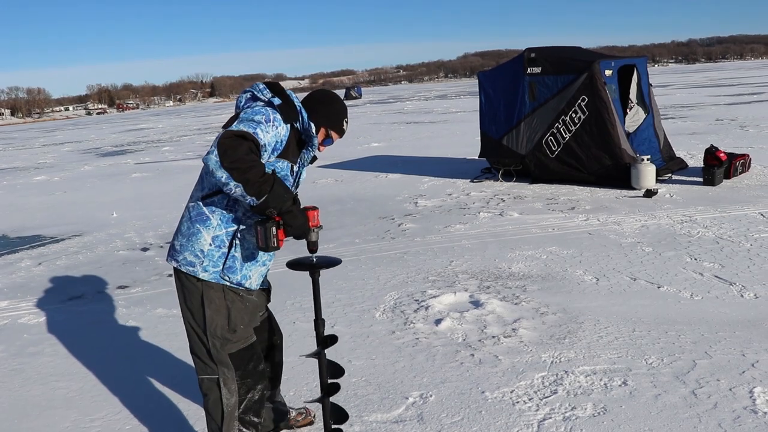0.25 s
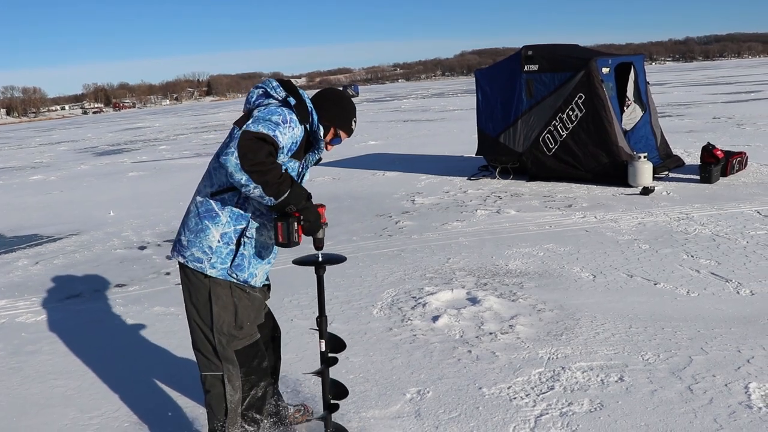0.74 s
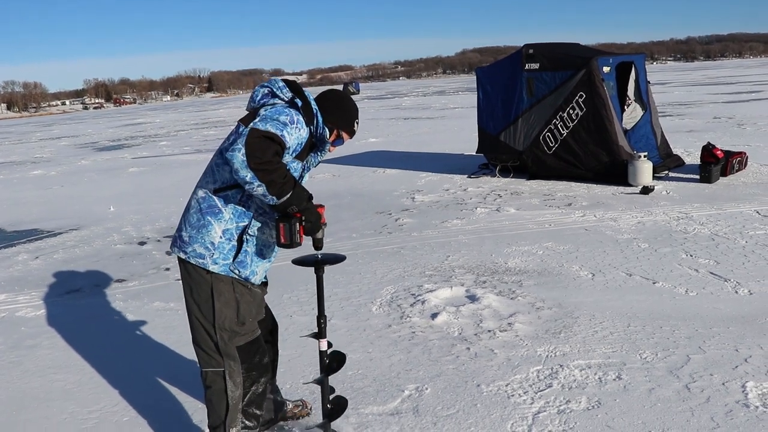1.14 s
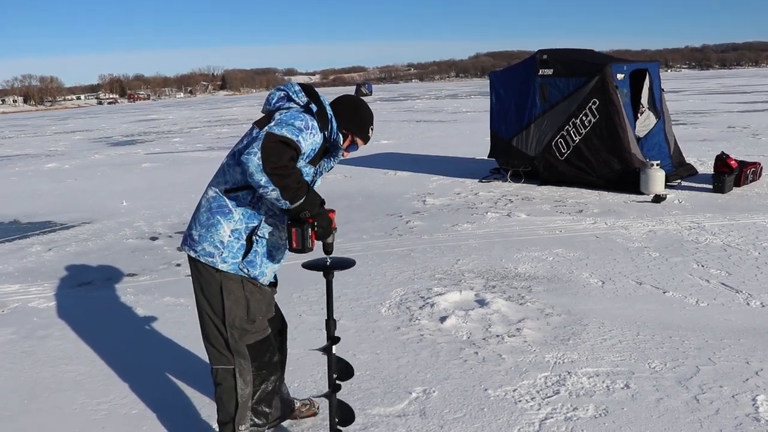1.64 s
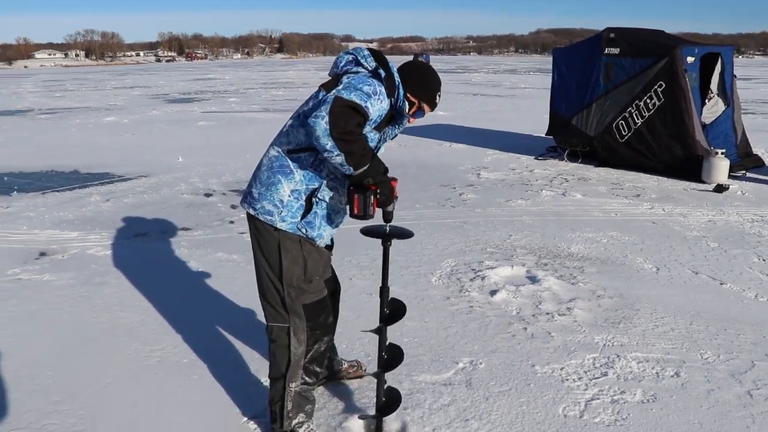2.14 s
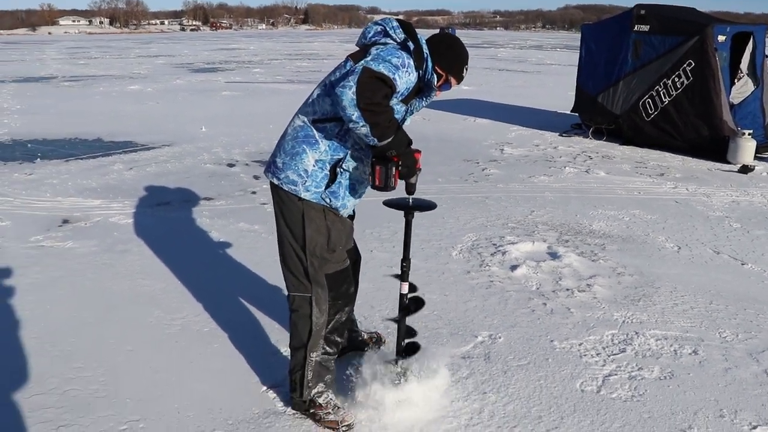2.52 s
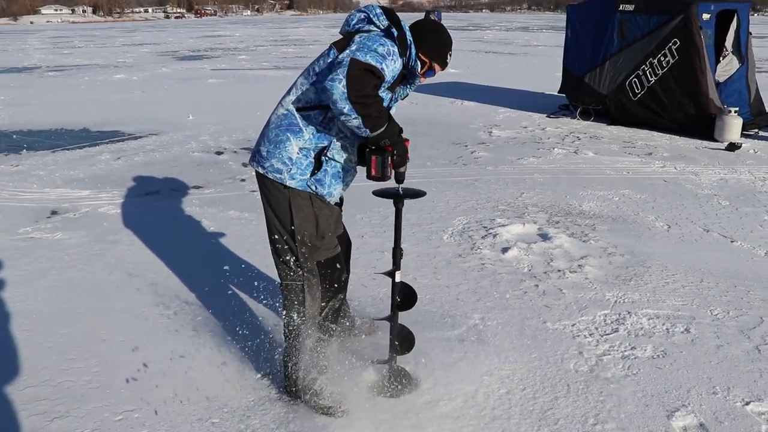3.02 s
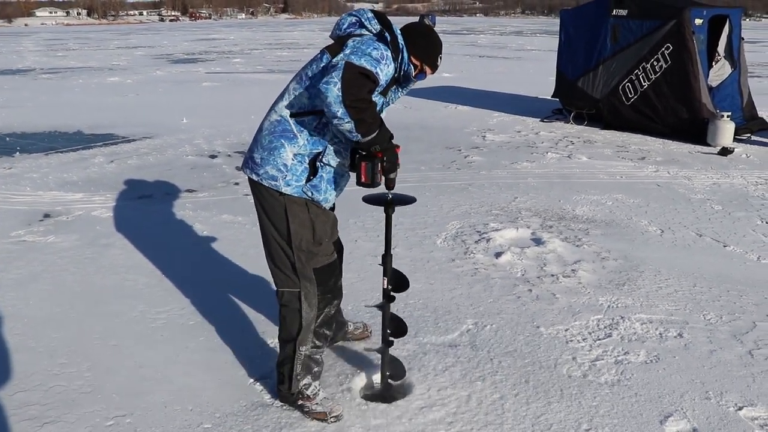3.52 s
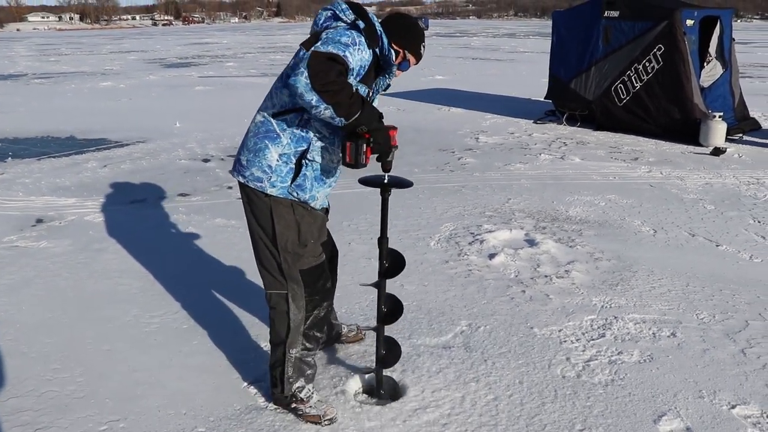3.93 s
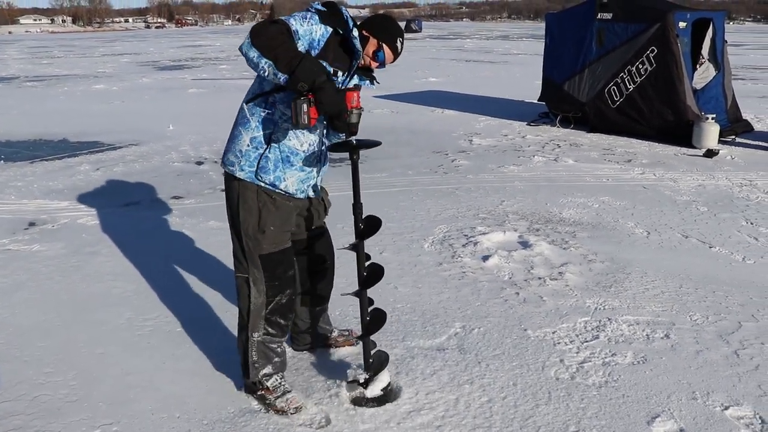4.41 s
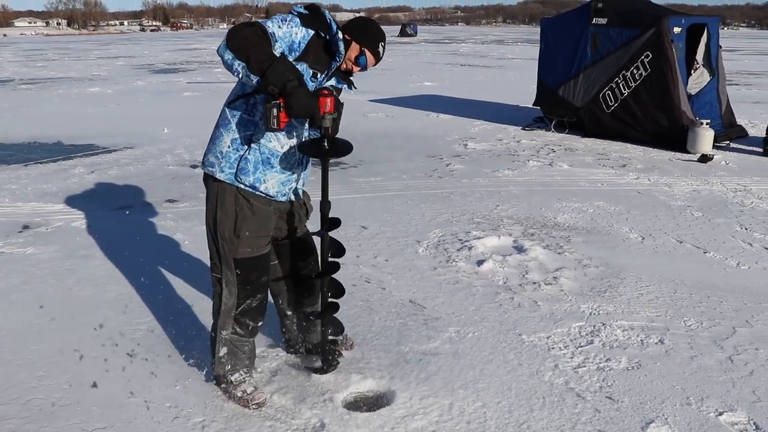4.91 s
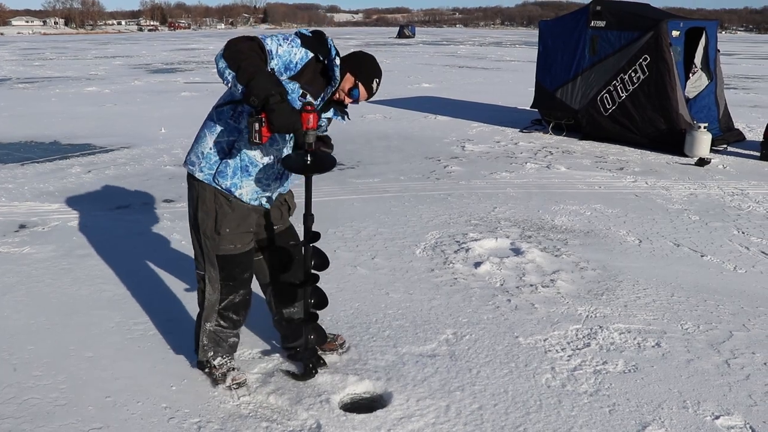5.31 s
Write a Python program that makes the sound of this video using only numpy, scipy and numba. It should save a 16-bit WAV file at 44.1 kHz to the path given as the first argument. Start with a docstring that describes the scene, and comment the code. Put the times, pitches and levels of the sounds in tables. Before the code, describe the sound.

On open lake ice, a few metres from the microphone, a drill-driven auger stutters and revs, then shaves steadily with a steely rasp, hollow crunch and fine hiss. After a quick rattle the cutting stops. The drill whines once more, very briefly, throwing off slush, followed by hollow knocks of ice lumps and sliding slush around the hole. The sound is dry, with a faint wind rumble underneath.

```python
"""On open lake ice, a few metres away, a cordless drill spins an auger while a light wind rumbles.
The gears whine up; the blades skip, bite, shave steadily, chatter at the bottom of the hole and stop.
A second short burst flings off the shavings; then lumps of ice knock and slush slides round the hole.
Cut and loose ice are showers of tiny fractures in three bands: a hollow crunch from the hole,
a steely rasp from the auger and a fine hiss."""
import sys
import numpy as np
from scipy import signal
from scipy.fft import rfft, irfft, next_fast_len
from scipy.io import wavfile
from scipy.ndimage import map_coordinates
from numba import njit

SR = 44100
rng = np.random.default_rng(int(sys.argv[2]) if len(sys.argv) > 2 else 0)


def generate_wav(sig):
    """Save sig (samples, or channels by samples) to the path in sys.argv[1] as 16-bit PCM at SR."""
    pcm = np.round(np.clip(np.atleast_2d(sig).T, -1, 1) * 32767).astype(np.int16)
    wavfile.write(sys.argv[1], SR, pcm)


N = 245028
TIME = np.arange(N) / SR


def undb(db):
    """Decibels to gain."""
    return 10 ** (np.asarray(db) / 20)


def unit(x):
    """Scale to rms 1."""
    return x / np.sqrt(np.mean(x ** 2))


def curves(table):
    """Each column after the time column as a value per sample."""
    times, *columns = np.transpose(table)
    return [np.interp(TIME, times, column) for column in columns]


def add(track, start_s, sound):
    """Mix a short sound into a track."""
    start = max(int(start_s * SR), 0)
    track[start:start + len(sound)] += sound[:N - start]


def envelope(start_s, length_s, attack_s, release_s):
    """Straight attack, with an exponential release from length_s after the start."""
    attack = np.clip((TIME - start_s) / attack_s, 0, 1)
    return attack * np.exp(-np.maximum(TIME - start_s - length_s, 0) / release_s)


def bump(centre_s, half_s):
    """A bell curve of height 1."""
    return np.exp(-((TIME - centre_s) / half_s) ** 2)


def wander(rate):
    """Smooth random drift through rate points a second; rms 1."""
    points = np.cumsum(np.full(N, rate / SR))
    return unit(map_coordinates(rng.standard_normal(4096), [points], order=3, mode="wrap"))


def colour(x, eq):
    """Minimum-phase EQ through (freq_hz, gain_db) points; rms 1."""
    hz, db = np.transpose(eq)
    size = next_fast_len(N + 8192) // 2 * 2
    freqs = np.maximum(np.arange(size // 2 + 1) * SR / size, 1)
    gain = undb(np.interp(np.log(freqs), np.log(hz), db))
    cepstrum = irfft(np.log(gain))
    cepstrum[1:size // 2] *= 2
    cepstrum[size // 2 + 1:] = 0
    return unit(irfft(np.exp(rfft(cepstrum)) * rfft(x, size))[:N])


@njit
def resonate(x, hz, width_hz):
    """State-variable band-pass whose centre can sweep."""
    out, band_state, low_state = np.empty(len(x)), 0., 0.
    for i in range(len(x)):
        tuning, damping = np.tan(np.pi * hz[i] / SR), width_hz / hz[i]
        band = (band_state + tuning * (x[i] - low_state)) / (1 + tuning * (tuning + damping))
        band_state = 2 * band - band_state
        low_state += 2 * tuning * band
        out[i] = damping * band
    return out


def fractures(rate, spread_db):
    """Tiny breaks in the ice, rate a second: many small, a few large; rms 1."""
    happens = rng.random(N) < rate / SR
    size = undb(spread_db * np.minimum(rng.exponential(size=N), 4))
    return unit(happens * size * rng.choice([-1, 1], N) / np.sqrt(rate))


# Low rumble of the wind: freq_hz, gain_db
WIND_EQ = [(15, -22), (30, -2.5), (50, -1.5), (72, 0), (100, -2.5), (150, -3.5), (260, -8), (600, -34.5)]
# Gusts over the steady bed: centre_s, half_length_s, level_db
GUSTS = [(.04, 0.12, -33.5), (.48, 0.21, -36.5), (1.7, 0.91, -52.5), (2.97, .05, -54), (3.33, 0.027, -37),
         (3.64, .03, -49), (4.69, 0.037, -45), (4.91, 0.035, -43), (5.33, 0.13, -41.5)]


def wind(bed_db=-55.5, flutter_db=2.0):
    """A light wind buffets the microphone, with a few gusts."""
    strength = undb(bed_db) + sum(undb(db) * bump(centre, half) for centre, half, db in GUSTS)
    rumble = colour(rng.standard_normal(N), WIND_EQ)
    return strength * unit(rumble * undb(flutter_db * wander(20)))


# Hollow body of the crunch: freq_hz, gain_db
CRUNCH_EQ = [(200, -53), (380, -13), (520, -6.5), (660, -2.5), (780, 3.5), (880, 4.5), (1000, -0.5),
             (1150, -6.5), (1400, -11), (2000, -18), (4000, -66)]


def crunch_tone(grains):
    """Breaking ice rings the hole."""
    return colour(grains, CRUNCH_EQ)


# Steely bite of the rasp: freq_hz, gain_db
RASP_EQ = [(700, -39), (1200, -7), (1600, -3), (1900, -0.5), (2250, 4), (2550, 2), (2850, 1.5), (3300, -4),
           (3900, -9.5), (4600, -10), (5600, -18.5), (7000, -20.5), (10000, -39)]


def rasp_tone(grains):
    """Breaking ice rings the auger's steel."""
    return colour(grains, RASP_EQ)


def shower(rise_s=0.13):
    """Envelope of flung shavings raining back on the ice: quick to start, slow to thin out."""
    return envelope(FLING_END_S, rise_s, rise_s, release_s=1.6)


def patter(crunch_db=-39, rasp_db=-46):
    """The larger crumbs of the shower land as separate ticks."""
    ticks = fractures(110, spread_db=3.0)
    return shower() * (undb(crunch_db) * crunch_tone(ticks) + undb(rasp_db) * rasp_tone(ticks))


# Heaps of slush giving way: start_s, length_s, attack_s, level_db
SLIDES = [(3.756, 0.03, .01, -30.5), (3.823, 0.063, .006, -30.5), (3.981, 0.018, 0.0037, -28.5),
          (4.04, 0.024, 0.0042, -30.5), (4.102, 0.14, 0.012, -30.5), (4.415, 0.064, 0.0091, -29.5),
          (5.039, 0.051, .01, -30), (5.276, 0.043, 0.0077, -23), (5.354, 0.13, 0.056, -19.5)]


def slides():
    """Envelope of the sliding heaps, each stopping short."""
    return sum(undb(db) * envelope(start, length, attack, release_s=0.011)
               for start, length, attack, db in SLIDES)


def slush_ring(pitch_hz=875.0, width_hz=210.0, gain_db=-5.5):
    """Sliding slush rings hollow in the hole, near 900 Hz."""
    hz = np.full(N, pitch_hz)
    grains = fractures(300, spread_db=3.0)
    ringing = resonate(resonate(grains, hz, width_hz), hz, width_hz)
    return undb(gain_db) * slides() * unit(ringing)


def slush(slide_db=(-1.5, -16, -44), shower_db=(-42, -41.5, -50), trickle_db=(-39.5, -49, -70)):
    """Power of crunch, rasp and hiss from sliding heaps, falling shavings and ever-trickling crumbs."""
    sliding = np.outer(undb(slide_db), slides())
    falling = np.outer(undb(shower_db), shower())
    return sliding ** 2 + falling ** 2 + undb(trickle_db)[:, None] ** 2


def ring(t, hz, rise_s):
    """A heavily damped resonance that swells for rise_s and dies in a few cycles."""
    return t / rise_s * np.exp(1 - t / rise_s) * np.sin(2 * np.pi * hz * t)


# Lump hits, with crack and thud sends relative to each: start_s, level_db, pitch_hz, crack_db, thud_db
KNOCKS = [(3.987, -21, 855, -19, -29), (4.107, -25, 850, -14, -28), (4.308, -20, 931, -18, -13),
          (4.37, -7.5, 944, -17, -12), (4.569, -8.5, 840, -6, -13), (4.881, -19, 840, -19, -24),
          (4.934, -19, 800, -2, -30), (4.961, -11.5, 890, -10, -40), (5.034, -13, 793, 0.5, -14),
          (5.049, -3.5, 825, -9, -40), (5.088, -14, 860, -24, -23), (5.121, -12.5, 760, -26, -20),
          (5.144, -9, 950, -30, -32), (5.159, -18, 805, -15, -27), (5.176, -11, 867, -20, -30),
          (5.215, -3, 856, -42, -19), (5.218, -1.5, 960, -40, -24), (5.229, -7, 920, -31, -36),
          (5.346, -6, 1080, -9, -16.5), (5.472, -4, 805, -23, -15), (5.491, -1.5, 770, -33, -49),
          (5.537, -9, 870, -9.5, -15)]


def lumps(crack_trim_db=-10, thud_hz=318):
    """Lumps of ice collide: a hollow knock, a bright crack and a low thud."""
    out, t = np.zeros(N), TIME[:2048]
    noise = rasp_tone(rng.standard_normal(N))
    for k, (start, db, hz, crack_db, thud_db) in enumerate(KNOCKS):
        knock = ring(t, hz, rise_s=0.00073)
        crack = undb(crack_db + crack_trim_db) * noise[k * len(t):(k + 1) * len(t)] * np.exp(-t / 0.005)
        thud = undb(thud_db) * ring(t, thud_hz, rise_s=0.0024)
        add(out, start + .0005, undb(db) * (knock + crack + thud))
    return out


# Bright accents of small chips: start_s, level_db, pitch_hz
CHIPS = [(0.4909, -3, 3100), (0.5687, -5, 2840), (4.3873, -22, 3140), (5.0274, -27, 2850),
         (5.1317, -28, 2725), (5.2645, -15, 3320), (5.3426, -20, 4600), (5.3521, -11.5, 3600),
         (5.415, -21, 3240)]


def chips(trim_db=-4):
    """Small chips snap and tinkle as they crack and land."""
    out, t = np.zeros(N), TIME[:2048]
    for start, db, hz in CHIPS:
        tinkle = ring(t, hz, rise_s=.0003) + .6 * ring(t, hz * rng.uniform(1.5, 2.2), rise_s=.0003)
        snap = np.diff(rng.standard_normal(len(t) + 1)) * np.exp(-t / 0.0022)
        add(out, start, undb(db + trim_db) * (tinkle + .18 * snap))
    return out


# Open depth of the hole, which slush fills as the auger lifts until it is flung off: time_s, depth_m
DEPTH = [(0, 0.012), (.62, 0.0047), (.95, .05), (1.15, 0.15), (2.1, 0.17), (3.1, 0.18), (4.25, 0.17),
         (4.42, 0.069), (4.53, 0.021), (4.6, 0.14), (5.5, 0.044)]
# Stretches where the hole's groan is quieter: start_s, length_s, loss_db
GROAN_DIPS = [(0.617, 0.32, 3), (2.12, 0.78, 6.5), (3.726, 0.32, 7), (4.578, 0.24, 5.5)]


def hole_groan(crunch_level, mouth_m=0.15, sound_m_s=343, gain_db=-14.5):
    """The crunch rings the hole's air column, a quarter wave whose pitch drops as it deepens."""
    hz = sound_m_s / (4 * (mouth_m + curves(DEPTH)[0]))
    dip_db = sum(db * envelope(start, length, 0.066, .04) for start, length, db in GROAN_DIPS)
    grains = fractures(1500, spread_db=3.0)
    column = resonate(resonate(grains, hz, 170.0), hz, 160.0)
    return unit(column) * crunch_level * undb(gain_db - dip_db)


# Low growl under the cut: time_s, pitch_hz, level_db
GROWL = [(.7, 87, -60), (1, 86, -56), (1.5, 84, -45), (2, 87.5, -48), (2.3, 88.6, -54), (2.45, 72, -49),
         (2.62, 74, -48), (2.75, 73.2, -75)]


def shaft_growl():
    """The shaft growls under load in a narrow band of noise."""
    hz, db = curves(GROWL)
    growl = resonate(resonate(rng.standard_normal(N), hz, 24.0), hz, 38.0)
    return unit(growl) * undb(db)


# Brief squeals and hums of the auger: start_s, length_s, pitch_hz, level_db
SQUEALS = [(0.071, 0.033, 522.4, -16.5), (0.113, 0.02, 938, -18), (0.239, 0.024, 807, -13),
           (0.586, 0.047, 716, -17), (0.57, 0.03, 892, -18.5), (2.853, 0.094, 2680, -25),
           (2.925, 0.16, 266.6, -30)]


def auger_squeals(shudder_db=2.5):
    """A stuttering blade locks on to one resonance, which swells, shudders and fades."""
    out = np.zeros(N)
    warped_time = np.cumsum(1 + .05 * wander(110)) / SR
    for start, length, hz, db in SQUEALS:
        swell = np.interp(TIME, start + length * np.array([0, 0.053, .5, 1]), [0.031, 1, 1, 0.018])
        out += np.sqrt(2) * undb(db) * swell * np.sin(2 * np.pi * hz * warped_time)
    return out * unit(undb(shudder_db * wander(110)))


# Trigger squeezes: start_s, squeeze_s, whistle_gain_db
PULLS = [(0, .49, -46), (4.5, .12, -54)]


def inverter_whistle(rotor_angle, carrier_hz=7750.0):
    """The inverter chops the current until the trigger is fully in: a carrier and two sidebands."""
    carrier = 2 * np.pi * carrier_hz * TIME
    sidebands = np.sin(carrier + 2 * rotor_angle) + 0.48 * np.sin(carrier - 2 * rotor_angle)
    chopping = sum(undb(db) * envelope(start, squeeze, attack_s=0.44, release_s=.02)
                   for start, squeeze, db in PULLS)
    return chopping * (sidebands + .25 * np.sin(carrier))


# Revs of the boring run and the flinging burst: time_s, rotor_hz
BORING_SPEED = [(0, 145), (.16, 158), (.22, 165), (.28, 156), (.345, 183), (.4, 250), (.445, 298),
                (.5, 338), (.57, 366), (.66, 353), (.74, 310), (.82, 240), (2.45, 220), (2.62, 232),
                (2.71, 268), (2.8, 238), (2.87, 262), (3, 205)]
FLING_SPEED = [(4.45, 120), (4.53, 225), (4.58, 352), (4.62, 358), (4.71, 337), (4.76, 200)]
# Fader on the whine in each run: time_s, gain_db
BORING_WHINE = [(.17, -39), (.22, -24), (.38, -28), (.445, -20), (.8, -24), (1.3, -29), (2.35, -32.5),
                (2.7, -23), (3, -33), (3.75, -48), (3.8, -66)]
FLING_WHINE = [(4.42, -55), (4.56, -32), (4.62, -15), (4.69, -29), (4.76, -72)]
# Gear and motor partials: rotor_multiple, level_db
ORDERS = [(5, -1), (6, -9), (8, -2), (10, 0), (12, -12), (16, -3), (18, -3)]
# Voice of the drill housing, strongest at 2.9 kHz: freq_hz, gain_db
HOUSING_EQ = [(700, -11), (1600, -10), (2200, -6), (2600, -5), (2900, 0), (3200, -5), (3700, -15),
              (4500, -24), (7000, -34)]


def drill(rough_db=3.0):
    """Gear partials swell as they sweep through the housing resonance, with the inverter on top."""
    rotor_hz = curves(BORING_SPEED + FLING_SPEED)[0] * (1 + .005 * wander(260))
    rotor_angle = 2 * np.pi * np.cumsum(rotor_hz) / SR
    housing_hz, housing_db = np.transpose(HOUSING_EQ)
    whine = np.zeros(N)
    for order, db in ORDERS:
        body_db = np.interp(np.log(order * rotor_hz), np.log(housing_hz), housing_db)
        whine += undb(db + body_db + rough_db * wander(160)) * np.sin(order * rotor_angle)
    fader = undb(curves(BORING_WHINE + FLING_WHINE)[0])
    return fader * whine + inverter_whistle(rotor_angle)


# Swell of the fling, a row each for crunch, rasp and hiss: peak_s, peak_db, rise_db_per_s
FLING = [(4.58, -16, 134), (4.601, -17.5, 189.5), (4.67, -36.5, 72)]
FLING_END_S, RUN_DOWN_S = 4.73, 0.013


def fling(sag_db_per_s=53):
    """Power of crunch, rasp and hiss as the auger throws coarse slush first and fine spray last."""
    db = [peak_db - rise * np.maximum(peak_s - TIME, 0) - sag_db_per_s * np.maximum(TIME - peak_s, 0)
          for peak_s, peak_db, rise in FLING]
    return (undb(db) * envelope(0, FLING_END_S, 1, RUN_DOWN_S)) ** 2


def chatter(start_s=3.523, every_s=.0403, length_s=0.026, bands_db=(-17, -20.5, -42.5)):
    """The blades chatter evenly at the bottom of the hole: six more rows like those of BITES."""
    return [(start_s + k * every_s, length_s, *bands_db) for k in range(6)]


# Single catches of a blade: start_s, length_s, crunch_db, rasp_db, hiss_db
BITES = [(.02, .023, -26, -18.5, -30), (0.066, 0.024, -15, -14, -35), (.108, .011, -14, -12, -33),
         (0.233, 0.03, -25, -16.5, -31.5), (0.393, 0.019, -23, -22, -33), (0.457, 0.06, -35, -32, -38),
         (0.573, 0.062, -20, -20.5, -34), (0.653, 0.077, -31, -24, -34), (2.652, 0.021, -15, -39, -42),
         (2.701, 0.02, -21, -19.5, -37.5), (2.745, 0.02, -16.5, -18.5, -34),
         (2.795, 0.038, -32, -16.5, -33.5), (2.844, 0.043, -37, -16, -41), (3.172, 0.01, -21.5, -26.5, -57),
         (3.311, 0.028, -16.5, -23, -56), (4.705, .019, -15.5, -7.5, -25.5),
         (5.264, 0.017, -28.5, -29.5, -48)]


def bites(dig_s=.0045, tail_s=0.004):
    """Power of crunch, rasp and hiss as a blade digs in, lets go and rings off."""
    power = np.zeros((3, N))
    for start, length, *bands_db in BITES + chatter():
        corners_s = [start - .002, start + dig_s, start + 0.79 * length, start + length]
        dig = np.interp(TIME, corners_s, [0.004, 1.14, 1.09, 0.6])
        tail = np.exp(-np.maximum(TIME - start - length, 0) / tail_s)
        power += np.outer(undb(bands_db), dig * tail) ** 2
    return power


# How hard the blades cut: time_s, rasp_db
CUT = [(0, -28.5), (.08, -30), (.18, -39.5), (.27, -23), (.35, -30), (.47, -25.5), (.63, -22), (.7, -14.5),
       (.8, -18), (1.5, -19), (2.08, -20.5), (2.28, -26.5), (2.49, -18), (2.6, -25.5), (2.95, -23),
       (3.1, -27), (3.49, -23), (3.52, -46.5)]
# Dips where the blades lose their grip: centre_s, half_length_s, loss_db
SKIPS = [(1.806, 0.024, 5.5), (2.598, .04, 1.5), (3.159, .018, 9.5), (3.25, 0.0085, 7.5)]


def shaving(stop_s=3.75, crunch_db_per_m=33.5, hiss_loss_db_per_m=7.5):
    """Power of crunch, rasp and hiss from the steady cut, which darkens as the hole deepens."""
    rasp_db, depth_m = curves(CUT)[0], curves(DEPTH)[0]
    crunch_db = -19.5 + 0.29 * rasp_db + crunch_db_per_m * depth_m
    hiss_db = rasp_db - 18 - hiss_loss_db_per_m * depth_m
    skip_db = sum(db * bump(centre, half) for centre, half, db in SKIPS)
    grip = undb(-skip_db) * envelope(0, stop_s, 0.0014, RUN_DOWN_S)
    return (grip * undb([crunch_db, rasp_db, hiss_db])) ** 2


# Sharp edge of blades near the surface, relative to the rasp: time_s, level_db
EDGE_LEVEL = [(0, -12), (.3, -8.5), (.6, -8.5), (1.1, -11.5), (1.6, -18), (5.5, -55)]
# Presence of that edge, and the airy top of the hiss: freq_hz, gain_db
EDGE_EQ = [(2500, -39), (3600, 3.5), (4500, 2.5), (5800, -5), (7000, -14), (9000, -27), (14000, -29)]
HISS_EQ = [(3000, -10), (5500, 10.5), (7200, 1), (8600, 2.5), (9800, -2.5), (10800, 2), (12200, 0.5),
           (14000, -7), (16000, -21)]


def blades_and_ice(scrape_power, bite_power, turn_hz=11.9, full_load_db=-21.5):
    """Fractures voice the three bands, throbbing as two blades stick and slip with each turn."""
    turn = 2 * np.pi * np.cumsum(turn_hz * (1 + 0.09 * wander(5))) / SR
    scrape = np.sqrt(scrape_power)
    # more rasp brings a deeper throb and denser grains
    load = np.minimum(scrape[1] / undb(full_load_db), 1)
    throb_db = load * (.9 * np.sin(turn) + .5 * np.sin(2 * turn))
    slip = unit(undb(throb_db + 1.1 * wander(130)))
    crunch, rasp, hiss = np.sqrt((slip * scrape) ** 2 + bite_power)
    rate = 450 + 8000 * np.minimum(rasp / undb(full_load_db), 1)
    shared = fractures(rate, spread_db=4.0)
    hollow = crunch_tone(.5 * shared + fractures(rate, spread_db=1.5)) * unit(undb(0.45 * wander(60)))
    steel = rasp_tone(shared + 0.85 * rng.standard_normal(N)) * unit(undb(wander(170)))
    edge = colour(fractures(rate, spread_db=6.5), EDGE_EQ) * undb(curves(EDGE_LEVEL)[0])
    spray = 0.11 * shared + fractures(rate, spread_db=5.5) + 1.15 * rng.standard_normal(N)
    air = colour(spray, HISS_EQ) * unit(undb(1.8 * wander(150)))
    return undb(-0.76) * crunch * hollow + undb(-1.0) * rasp * (steel + edge) + undb(2.0) * hiss * air


def scene():
    """A dry mono mix: open ice returns no echo."""
    scrape_power, bite_power = shaving() + fling() + slush(), bites()
    crunch_level = np.sqrt(scrape_power[0] + bite_power[0])
    auger = blades_and_ice(scrape_power, bite_power) + auger_squeals()
    body = hole_groan(crunch_level) + shaft_growl()
    return (auger + body + wind() + drill() + lumps() + chips() + patter() + slush_ring())[None]


def record(dry, top_hz=15850):
    """Clip the highest peaks and cut the top with a steep low-pass."""
    low_pass = signal.ellip(10, .2, 70, top_hz, fs=SR, output="sos")
    return signal.sosfilt(low_pass, np.clip(dry, -1, 1))


dry = scene()
out = record(dry)
generate_wav(out)
```